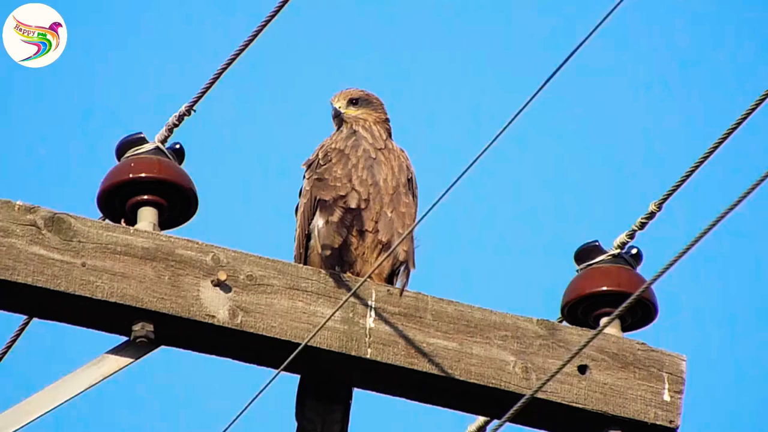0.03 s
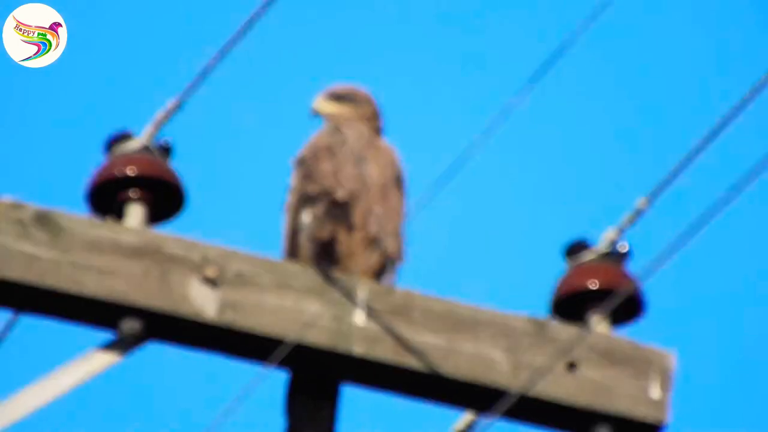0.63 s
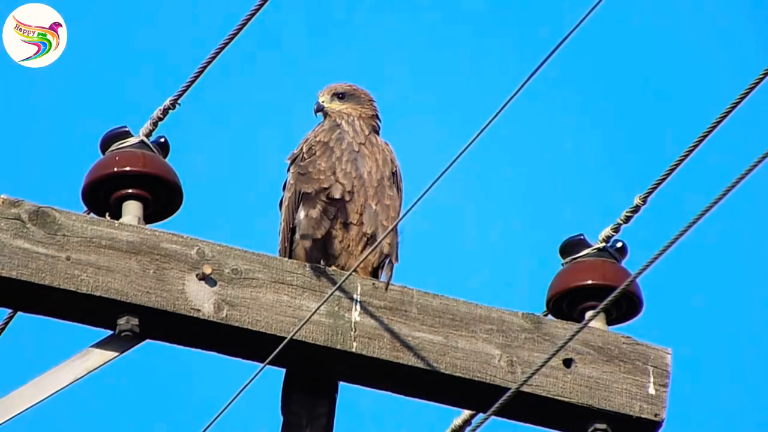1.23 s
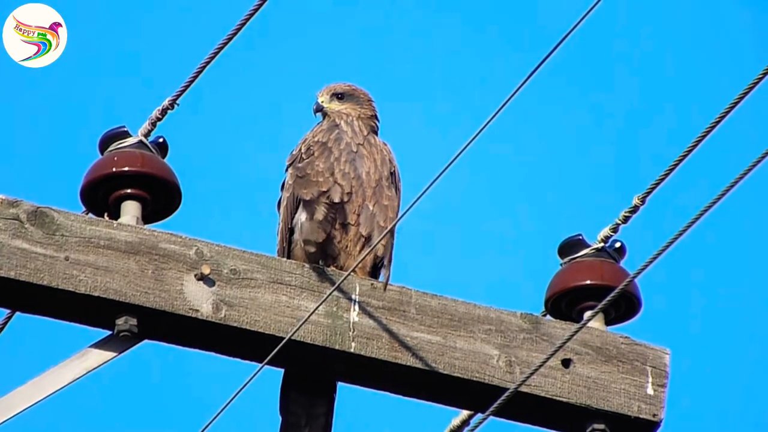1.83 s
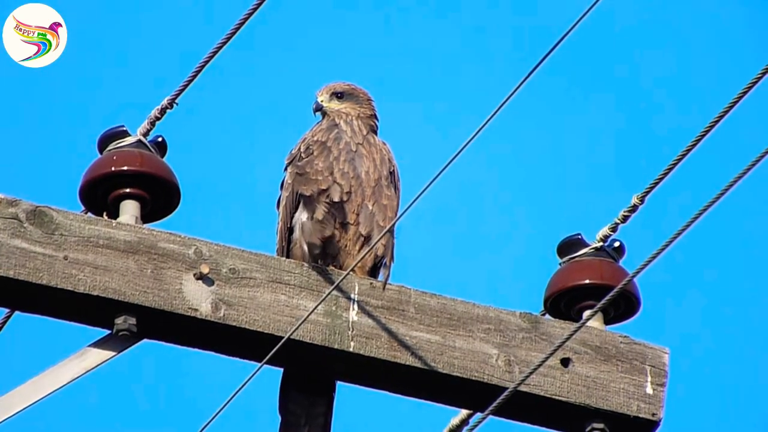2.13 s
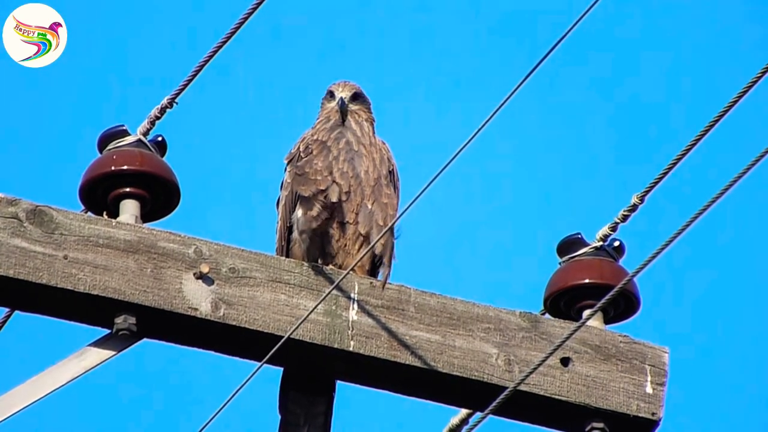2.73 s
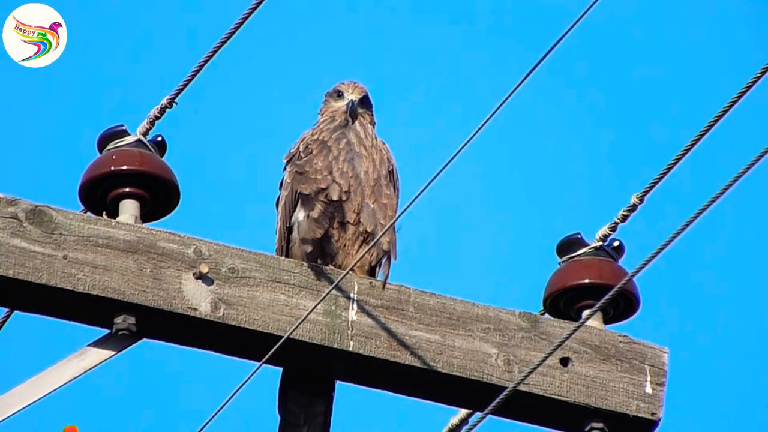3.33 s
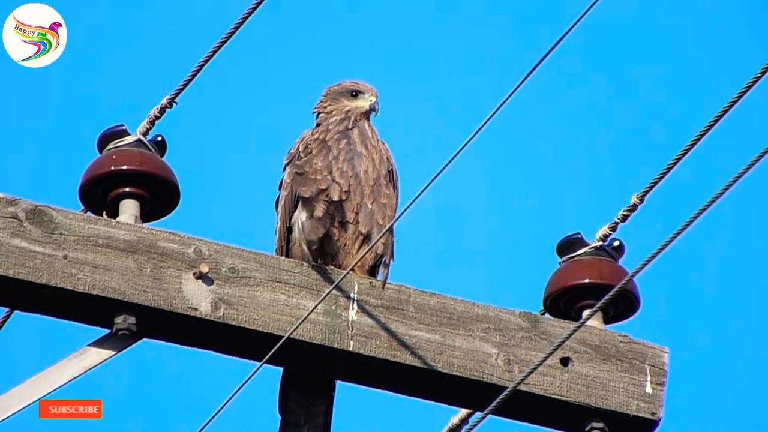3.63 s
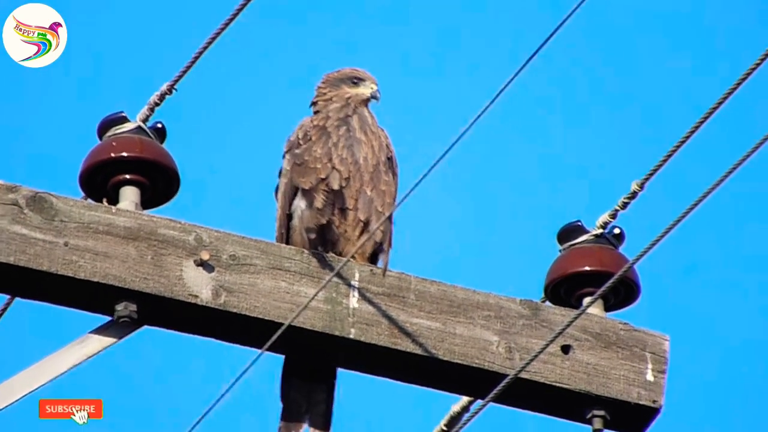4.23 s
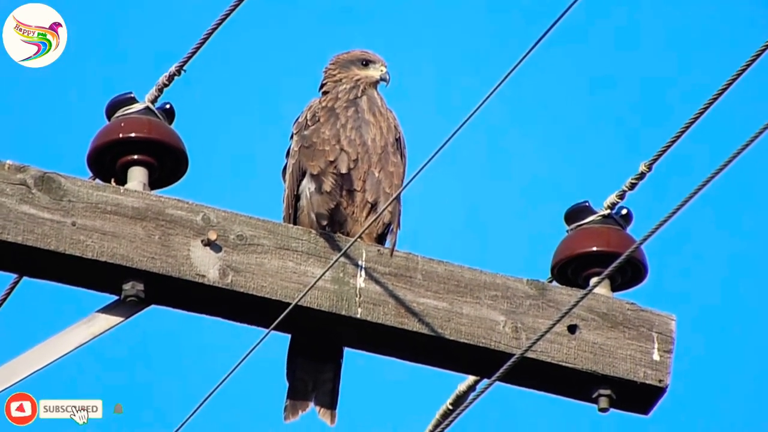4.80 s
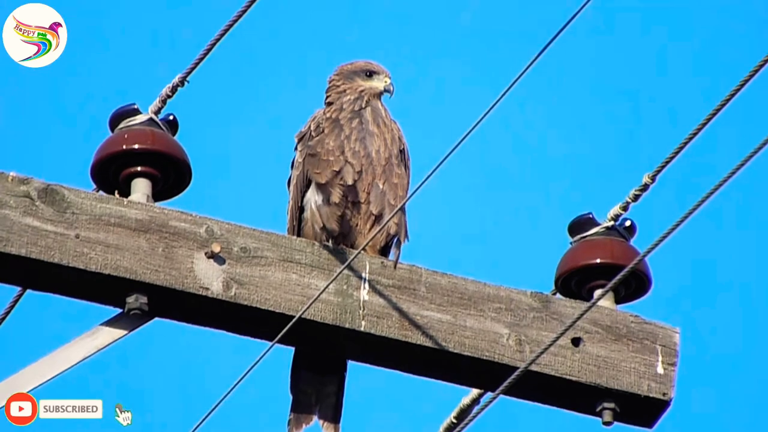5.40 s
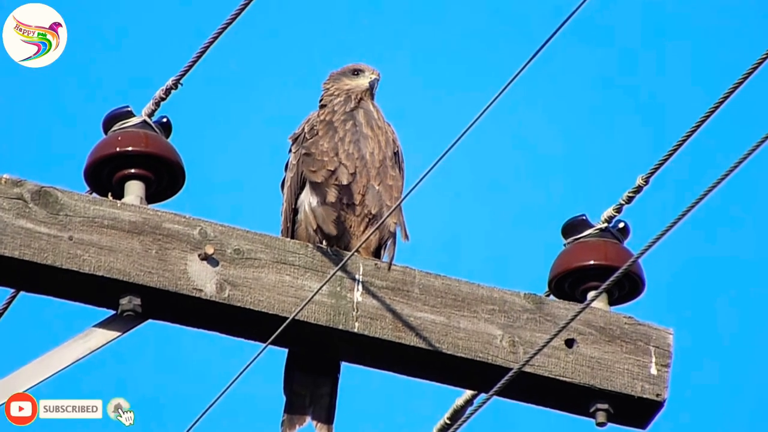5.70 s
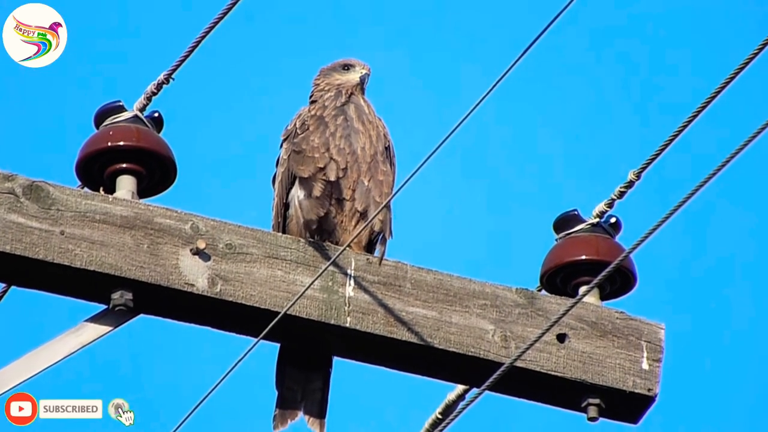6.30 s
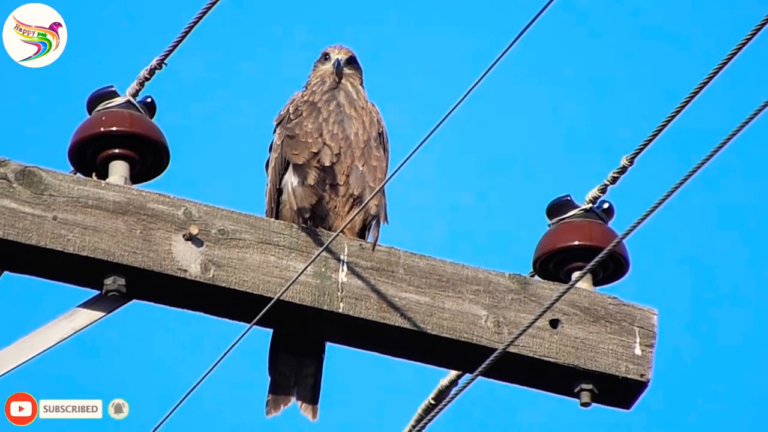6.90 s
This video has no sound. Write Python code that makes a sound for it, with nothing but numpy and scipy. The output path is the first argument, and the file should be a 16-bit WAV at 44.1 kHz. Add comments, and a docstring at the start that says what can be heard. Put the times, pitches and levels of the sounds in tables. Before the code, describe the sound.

Small birds twitter faintly in open country while wind gusts buffet the microphone over a distant traffic rumble.

```python
"""Open country on a breezy day: small birds, swallows by the sound, twitter some way off.
Each syrinx bends a near sine into down-slides, double peaks, two-voiced arches and rasps.
Behind them lie the rumble of far traffic, a faint engine note, airy hiss and soft rustling.
Gusts and eddies buffet the microphone, and a lens motor whirs twice, with one tick just
ahead of its second run. The sound fades in at the start."""
import sys
import numpy as np
from scipy import signal
from scipy.fft import rfft, irfft
from scipy.io import wavfile
from scipy.ndimage import uniform_filter1d

SR = 44100
rng = np.random.default_rng(int(sys.argv[2]) if len(sys.argv) > 2 else 0)


def inscribe(sig):
    """Save sig as 16-bit PCM at rate SR to the path in sys.argv[1].

    A 1-D sig is mono; a 2-D sig holds one channel per row.
    Samples are clipped to [-1, 1] before scaling.
    """
    pcm = np.round(np.clip(np.atleast_2d(sig).T, -1, 1) * 32767)
    wavfile.write(sys.argv[1], SR, pcm.astype(np.int16))


N = 315315
TIME = np.arange(N) / SR


def from_db(db):
    return 10 ** (np.asarray(db) / 20)


def rms_one(x):
    return x / np.sqrt(np.mean(x ** 2) + 1e-20)


def in_time(rows, at=TIME):
    """Each column of a breakpoint curve, joined by straight lines."""
    times, *columns = np.transpose(rows)
    return [np.interp(at, times, column) for column in columns]


def at_hz(points, hz):
    """A spectrum read on a log-frequency axis."""
    points_hz, values = np.transpose(points)
    return np.interp(np.log(hz + 1e-3), np.log(points_hz), values)


def panned(x, pan_db):
    """Constant-power pan; positive is left."""
    gains = np.array([from_db(pan_db / 2), from_db(-pan_db / 2)]).reshape(2, -1)
    return x * gains / np.sqrt(np.mean(gains ** 2, axis=0))


def add(out, start_s, sound):
    """Mix a sound in from a given time."""
    i = max(0, int(start_s * SR))
    out[..., i:i + sound.shape[-1]] += sound[..., :max(0, N - i)]


def drift(rate, size=N):
    """Random modulation of spread 1 that changes about rate times a second."""
    knots = rng.standard_normal(size // 8 + 2)
    return np.interp(np.arange(size) * rate / SR, np.arange(len(knots)), knots) * np.sqrt(3 / 2)


def band(x, low_hz, high_hz):
    sos = signal.butter(2, [low_hz, min(high_hz, .45 * SR)], "band", fs=SR, output="sos")
    return signal.sosfilt(sos, x)


def noise_band(size, low_hz, high_hz):
    """Noise of rms 1, band-passed twice for steep skirts."""
    return rms_one(band(band(rng.standard_normal(size), low_hz, high_hz), low_hz, high_hz))


def swell(peak_s, hold_s, attack_s, release_s):
    """An envelope that grows exponentially to its peak, holds and dies away."""
    since = TIME - peak_s
    return np.exp(np.minimum(since, 0) / attack_s - np.maximum(since - hold_s, 0) / release_s)


def wind_level(attack_s=0.03, release_s=0.036):
    """Breeze and gusts add in power at each microphone port: left and right envelopes in dB."""
    # light breeze between the gusts: time_s, level_db
    breeze = [(.5, -39.5), (1.4, -48.5), (2.05, -34), (2.95, -41), (3.8, -38), (4.7, -41), (5.8, -39),
              (6.15, -44.5)]
    # gusts on the microphone: peak_s, hold_s, level_db, pan_db
    gusts = [(0.293, 0.06, -28, 2.5), (0.642, 0.1, -31, 3.5), (0.788, 0.16, -23.5, 0.5),
             (1.041, 0.029, -28.5, 0), (1.177, 0.03, -20, -7.5), (1.562, .06, -32.5, 2),
             (1.734, .11, -28, -0.5), (2.5, 0.25, -35.5, 2), (3.108, 0.12, -29, 1.5),
             (3.321, 0.23, -24.5, 2.5), (4.348, 0.13, -33.5, -5), (5.313, .05, -35, 5),
             (5.571, 0.053, -34.5, 2), (5.92, .13, -25.5, 5.5), (6.835, .15, -22.5, 4),
             (7.024, 0.12, -18.5, -2.5)]
    power = panned(from_db(in_time(breeze)[0]), pan_db=3) ** 2
    for peak_s, hold_s, db, pan_db in gusts:
        power += panned(from_db(db) * swell(peak_s, hold_s, attack_s, release_s), pan_db) ** 2
    return 10 * np.log10(power)


def wind(brightening=0.22, calm_db=-39, lump_db=2.5, trim_db=-1.5):
    """Each port has its own turbulence; harder gusts hold smaller eddies and so sound brighter."""
    # spectrum of the buffeting: frequency_hz, density_db
    colour = [(20, 7), (45, 3.5), (75, -2.5), (125, -16.5), (200, -32), (330, -44), (800, -85)]
    gust_db = wind_level()
    edges = 16 * 2 ** np.arange(0, 6, .5)   # half-octave bands, Hz
    centres = np.sqrt(edges[1:] * edges[:-1])
    shares = from_db(at_hz(colour, centres)) * np.sqrt(centres)
    white, out = rng.standard_normal((2, 2, N)), 0
    for k, (hz, share) in enumerate(zip(centres, shares / np.linalg.norm(shares))):
        lift_db = brightening * np.maximum(gust_db - calm_db, 0) * np.log2(hz / 60)
        out = out + share * from_db(lift_db) * rms_one(band(white[k % 2], edges[k], edges[k + 1]))
    lumps = np.array([drift(24), drift(24)])
    return out * from_db(gust_db + trim_db + lump_db * lumps)


def distant_noise(spectrum, ripple_db=0):
    """A diffuse stereo bed of rms 1, wider in the treble; many paths can ripple its spectrum."""
    # likeness of left and right: frequency_hz, correlation
    likeness = [(40, .1), (130, 1), (290, 0.86), (700, 0.81), (1400, 0.73), (3100, 0.37), (6800, 0.52),
                (15000, 0.25)]
    hz = np.arange(N // 2 + 1) * SR / N
    alike = np.clip(at_hz(likeness, hz), 0, .99)
    mid, side = rfft(rng.standard_normal((2, N)))
    stereo = np.sqrt(1 + alike) * mid + np.sqrt(1 - alike) * side * [[1], [-1]]
    ripple = ripple_db * np.interp(hz, np.arange(400, 4000, 45), rng.standard_normal(80), 0, 0)
    return rms_one(irfft(stereo * from_db(at_hz(spectrum, hz) + ripple), N))


def traffic(flicker_db=1.0, trim_db=6.0):
    """Far traffic arrives by many paths as a low, gently flickering rumble."""
    # spectrum of the rumble: frequency_hz, density_db
    colour = [(40, 0.5), (130, 2.5), (200, -3.5), (300, 1.5), (390, -2.5), (440, -0.5), (540, -2.5),
              (680, -8), (930, -4), (1300, -9), (1800, -11.5), (2200, -18), (3500, -26.5)]
    # its slow rise and fall, before the trim: time_s, level_db
    ride = [(.4, -58), (.7, -57), (1.7, -58.5), (2.8, -61), (4.2, -60), (5.5, -59.5), (7.15, -59.5)]
    level_db = in_time(ride)[0] + trim_db + flicker_db * drift(8)
    return from_db(level_db) * distant_noise(colour, ripple_db=2.0)


def engine_drone(pitch_hz=432, wander_hz=5):
    """A faint engine note wavers in the far traffic and grows between 2 and 3.6 s."""
    phase = 2 * np.pi * np.cumsum(pitch_hz + wander_hz * drift(14)) / SR
    growth = np.interp(TIME, [2, 3.6], [.3, 1.4])
    return from_db(-69 + 4.3 * drift(3.16)) * growth * np.sin(phase)


def air(level_db=-62.5):
    """The steady hiss of open air."""
    # spectrum of the hiss: frequency_hz, density_db
    colour = [(1500, -4.5), (2300, 2), (3200, 2.5), (4400, 0), (5800, -0.5), (7500, -6.5), (11000, -6),
              (15500, -11)]
    return from_db(level_db) * distant_noise(colour)


def rustle(rest_db=-76, flutter_db=1.3):
    """A bright, fluttering rustle comes and goes in soft swells."""
    # spectrum of the rustle: frequency_hz, density_db
    colour = [(1000, -25), (2500, -7), (4200, -3), (5800, 1), (7200, -3.5), (9000, -7.5), (12000, -11.5),
              (15500, -44)]
    # swells: peak_s, level_db, rise_s, fall_s
    swells = [(.33, -56.5, .15, 0.27), (1.45, -58, 0.64, 0.29), (1.67, -52, 0.19, .12),
              (2.32, -59, 0.13, 0.2), (3.02, -65.5, 0.095, .08)]
    power = sum((from_db(db) * swell(peak_s, 0, rise, fall)) ** 2 for peak_s, db, rise, fall in swells)
    envelope = np.sqrt(from_db(rest_db) ** 2 + power)
    return envelope * from_db(flutter_db * drift(39.73)) * distant_noise(colour)


def syrinx(hz, level_db, rasp, waver=0.0069, rasp_swing=0.037, rasp_rate=600):
    """A near sine; an unsteady membrane shakes pitch and level, adds an overtone, chops air to hiss."""
    n = len(hz)
    shake = waver * drift(300, n) + rasp * rasp_swing * drift(2 * rasp_rate, n)
    phase = 2 * np.pi * np.cumsum(hz * (1 + shake)) / SR
    envelope = from_db(level_db) * (1 + 0.39 * rasp * drift(rasp_rate, n)) * signal.windows.tukey(n, .2)
    hiss = noise_band(n, 2000, 7000)
    overtone = .35 * np.sin(2 * phase) / (1 + (hz / 4300) ** 6)   # the beak dulls the highest overtones
    return envelope * (np.sin(phase) + rasp * overtone + .6 * rasp ** 2 * hiss)


def glide(length_s, pitch_hz, octaves, level_db, rasp, arc_oct=0, edge_db=1.5):
    """A plain note moves evenly in pitch, may arc over on the way, and swells in its middle."""
    progress = np.linspace(0, 1, int(length_s * SR))
    edge = (2 * progress - 1) ** 2
    hz = pitch_hz * 2 ** (octaves * progress + arc_oct * (1 / 3 - edge))
    return syrinx(hz, level_db - edge_db * edge, rasp)


def syllable(shape, length_s, level_db, pitch_ratio=1, rasp=0.11):
    """A stock shape stretched to a length, corners rounded; no two are sung at quite the same pitch."""
    hz, contour_db = in_time(shape, np.linspace(0, 1, int(length_s * SR)))
    hz = uniform_filter1d(hz, size=100, mode="nearest") * rng.normal(1, .008)
    return syrinx(pitch_ratio * hz, level_db + contour_db, rasp)


def near_birds():
    """The nearer birds twitter in stock syllables, with scratchy and falling notes between them."""
    # syllable shapes: share_of_length, pitch_hz, gain_db
    double_peak = [(0, 3950, -12), (.17, 4740, -13.5), (.3, 6250, -9.5), (.42, 4920, -7),
                   (.56, 4550, -14.5), (.72, 5040, -4.5), (.85, 6010, -9.5), (1, 5100, 3)]
    slide = [(0, 5000, -1), (.3, 4510, 0), (.65, 3950, -3.5), (1, 3650, -2.5)]
    dip = [(0, 4150, 0), (.2, 3310, -2), (.42, 2840, -1), (.8, 4250, -2), (1, 4450, 5)]
    upsweep = [(0, 2600, -6), (.5, 3670, -1.5), (1, 5700, -1.5)]
    lead_in = [(0, 4960, 0), (.5, 5530, -1.5), (1, 5950, -3)]
    arch = [(0, 2560, -9), (.25, 3700, -8.5), (.42, 4650, -3.5), (.65, 4500, -5), (.87, 4300, -8),
            (1, 3680, -3)]
    out = np.zeros(N)
    # one bird repeats a short down-slide: start_s, level_db
    slides = [(2.286, -54.5), (2.492, -54), (2.782, -53.5), (3.093, -54.5), (3.284, -53), (3.492, -54),
              (3.671, -52.5), (3.882, -52), (4.142, -53), (4.373, -52), (4.661, -55), (5.388, -54.5),
              (5.521, -55), (5.707, -55.5), (5.885, -56)]
    for start_s, db in slides:
        add(out, start_s, syllable(slide, length_s=0.015, level_db=db))
    # double-peaked calls: start_s, length_s, level_db, pitch_ratio, rasp (0-1)
    double_peaks = [(0.369, 0.085, -47.5, 1.13, .55), (.49, 0.055, -48, 0.96, 0.5),
                    (0.937, 0.049, -43.5, 0.98, 0.15), (3.81, 0.062, -49.5, 1.1, 0.3),
                    (6.089, .054, -41.5, 1, 0.3), (6.466, .048, -41, 1, .11), (6.597, .046, -42.5, 0.96, 0)]
    for start_s, length_s, db, pitch_ratio, rasp in double_peaks:
        add(out, start_s, syllable(double_peak, length_s, db, pitch_ratio, rasp))
    # arches sung on both sides of the syrinx: start_s, length_s, level_db, upper_ratio, lower_ratio
    arches = [(4.817, 0.066, -53.5, 1.04, 0.96), (5.437, 0.057, -52.5, 1.14, 0.97),
              (5.627, .058, -50.5, 1.02, 0.89), (6.013, .065, -52, .82, .79),
              (6.823, 0.078, -48, 1.18, 0.96)]
    for start_s, length_s, db, upper, lower in arches:
        add(out, start_s - .01, syllable(lead_in, length_s=0.02, level_db=db - 5, rasp=0.64))
        for pitch_ratio in (upper, lower):
            add(out, start_s, syllable(arch, length_s, db, pitch_ratio, rasp=0.5))
    # up-sweeps through an octave: start_s, length_s, level_db
    upsweeps = [(4.6, .045, -59), (5.974, 0.063, -54.5), (6.121, 0.029, -52.5), (6.878, 0.017, -52),
                (6.944, .03, -49)]
    for start_s, length_s, db in upsweeps:
        add(out, start_s, syllable(upsweep, length_s, db, rasp=0.75))
    # one buzzy whistle dips and climbs back
    add(out, 4.115, syllable(dip, length_s=.23, level_db=-59.5, rasp=0.64))
    # loose falling notes: start_s, length_s, pitch_hz, fall_octaves, level_db
    falls = [(0.761, 0.024, 4100, 0.49, -56.5), (.97, .027, 4100, 0.63, -53),
             (1.183, 0.018, 3970, 0.48, -55), (2.5, 0.046, 6450, .22, -60), (2.68, 0.043, 6150, 0.18, -59),
             (5.075, 0.016, 6940, 1, -54.5), (5.322, .016, 6300, 0.29, -59.5),
             (5.796, .021, 6200, 1.06, -55), (6.202, .012, 6500, 0.5, -57)]
    for start_s, length_s, hz, octaves, db in falls:
        add(out, start_s, glide(length_s, hz, -octaves, db, rasp=0.44))
    # scratchy notes that arc up and back: start_s, length_s, pitch_hz, level_db
    rasps = [(0.323, 0.076, 5800, -57), (4.074, 0.043, 5410, -60.5), (4.092, .044, 3840, -56),
             (4.547, .022, 5400, -57), (4.245, 0.034, 5900, -63), (5.082, 0.032, 3300, -58.5),
             (5.756, 0.043, 5730, -58), (5.991, 0.028, 5370, -60), (6.154, .075, 3800, -57.5),
             (6.193, .035, 3320, -54.5), (6.889, 0.018, 5300, -52), (6.904, .045, 3600, -59)]
    for start_s, length_s, hz, db in rasps:
        add(out, start_s, glide(length_s, hz, 0, db, rasp=0.98, arc_oct=0.198))
    return out


def outdoors(x, echo_s=.011, echo_db=-20, scatter_db=-9, t60_s=0.22):
    """One weak ground echo and a thin scattered tail."""
    out = np.tile(x, (2, 1))
    add(out, echo_s, from_db(echo_db) * x)
    t = TIME[:SR // 2]
    tail = rms_one(rng.standard_normal((2, len(t))) * from_db(-60 * t / t60_s)) / np.sqrt(len(t))
    return out + from_db(scatter_db) * signal.fftconvolve(x[None], tail, axes=1)[:, :N]


def lens_motor():
    """The lens motor whirs in short steps, its friction ringing the resonances of the barrel."""
    # motor steps: start_s, length_s, level_db
    steps = [(0.576, 0.024, -56), (0.612, 0.029, -56), (0.645, 0.039, -53.5), (0.716, 0.048, -54),
             (0.78, 0.104, -56.5), (1.529, 0.056, -54), (1.588, 0.059, -52.5)]
    # barrel resonances: frequency_hz, width_hz, gain_db
    resonances = [(313, 25, -6), (560, 27, 3), (898, 55, 5.5), (1733, 54, 3)]
    drive, whir = np.zeros(N), np.zeros(N)
    for start_s, length_s, db in steps:
        add(drive, start_s, from_db(db) * signal.windows.tukey(int(length_s * SR), .4))
    friction = rng.standard_normal(N)
    for hz, width_hz, db in resonances:
        ring = signal.lfilter(*signal.iirpeak(hz, hz / width_hz, SR), friction)
        whir += from_db(db) * rms_one(ring)
    return drive * rms_one(whir)


def eddies(low_cut_hz=45):
    """A passing eddy sucks briefly at a port; the microphone's bass cut makes it swing back."""
    # single eddies, before the bass cut: peak_s, level_db, width_s, pan_db
    hits = [(0.779, -16, 0.0019, -1), (.820, -14, 0.0031, 7), (.897, -8, 0.0014, -20),
            (.908, -7, 0.0014, 26), (0.955, -14.5, 0.0036, 21), (1.051, -18.5, 0.0014, -29),
            (1.186, -13.5, 0.0011, -25), (1.199, -17, 0.0011, -28), (3.457, -18.5, 0.0018, 0),
            (7.049, -10.5, 0.0012, -21), (7.114, -6, 0.0012, -30)]
    out = np.zeros((2, N))
    t = TIME[:SR // 25] - 1 / 50   # 40 ms centred on the peak
    for peak_s, db, width_s, pan_db in hits:
        suction = -from_db(db) * np.exp(-(t / width_s) ** 2)
        add(out, peak_s + t[0], panned(suction, pan_db))
    return band(out + 1e-18, low_cut_hz, 1300)


def camera_tick(start_s=1.491, level_db=-34.5, decay_s=0.0022):
    """One small, dry tick of the camera between the motor's two runs."""
    out, t = np.zeros(N), TIME[:SR // 50]
    add(out, start_s, from_db(level_db) * noise_band(len(t), 1200, 4300) * np.exp(-t / decay_s))
    return out


def far_birds(from_s=3.4, notes_per_s=11, pitch_hz=4750, spread_oct=0.37, bend_oct=.3):
    """Farther birds add one low, hoarse whistle and faint notes of random pitch, bend and length."""
    out = np.zeros(N)
    add(out, 4.56, glide(length_s=.2, pitch_hz=1944, octaves=-0.061, level_db=-65, rasp=.7))
    count = int(notes_per_s * (N / SR - from_s))
    for k, (late, long, high, bend, loud) in enumerate(rng.uniform(-1, 1, (count, 5))):
        length_s = 0.028 * 2 ** long
        hz = pitch_hz * 2 ** (spread_oct * high)
        note = glide(length_s, hz, bend_oct * bend, level_db=-65.5 + 2 * loud, rasp=0.92)
        add(out, from_s + (k + late) / notes_per_s, note)
    return out


def scene():
    """Wind and camera up close, the distant bed behind, the birds a little to the left."""
    buffeting = wind() + eddies()
    bed = panned(traffic(), 2.2) + panned(air() + rustle(), .3) + engine_drone()
    camera = lens_motor() + camera_tick()
    birds = outdoors(near_birds() + far_birds())
    return buffeting + bed + camera + panned(birds, 2.0)


def record(dry, cutoff_hz=15480):
    """The sound fades in; the top is cut steeply."""
    # opening fade: time_s, gain_db
    fade_in = [(0, -90), (.13, -37.5), (.2, -15), (.245, -8.5), (.285, -1), (.32, -1)]
    faded = dry * from_db(in_time(fade_in)[0])
    return signal.sosfilt(signal.ellip(12, .1, 80, cutoff_hz, fs=SR, output="sos"), faded)


dry = scene()
out = record(dry)
inscribe(out)
```